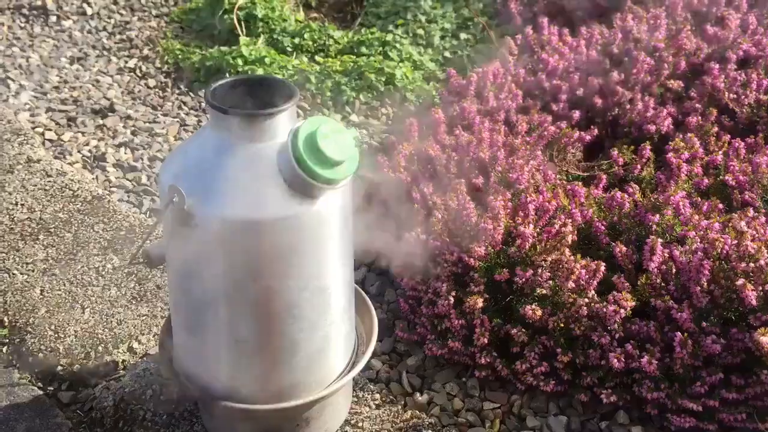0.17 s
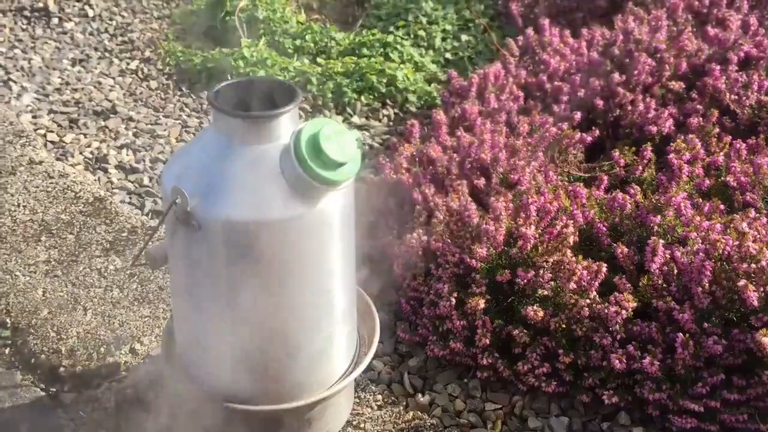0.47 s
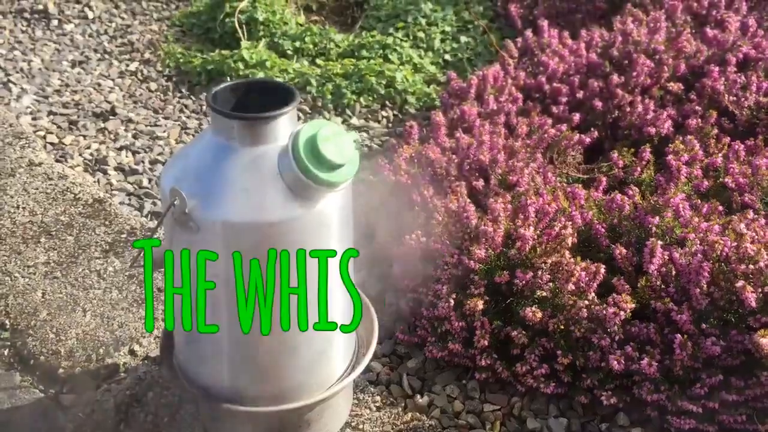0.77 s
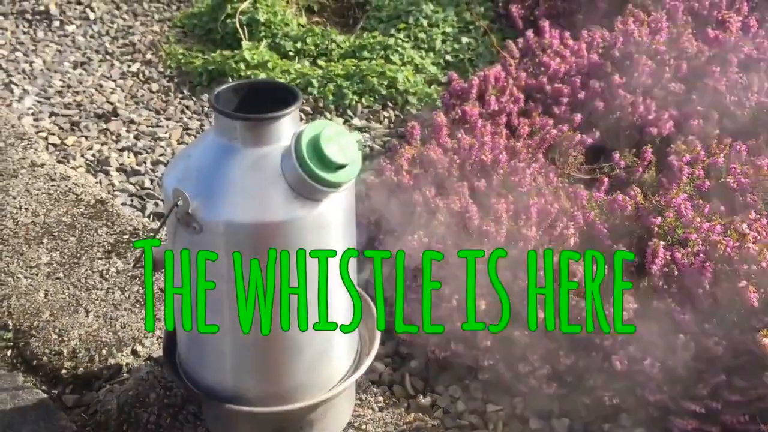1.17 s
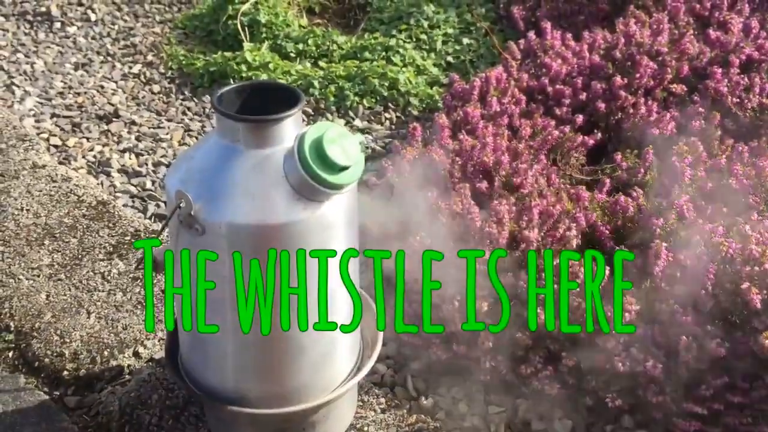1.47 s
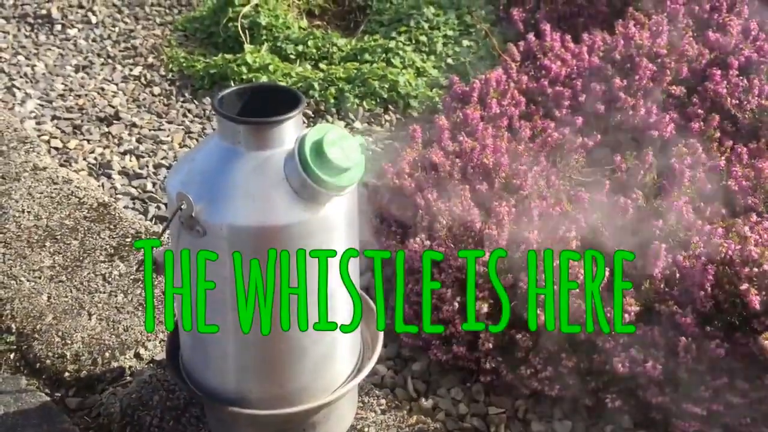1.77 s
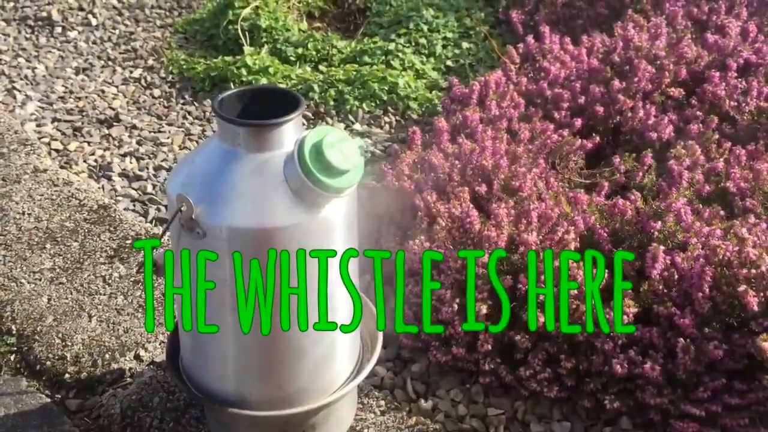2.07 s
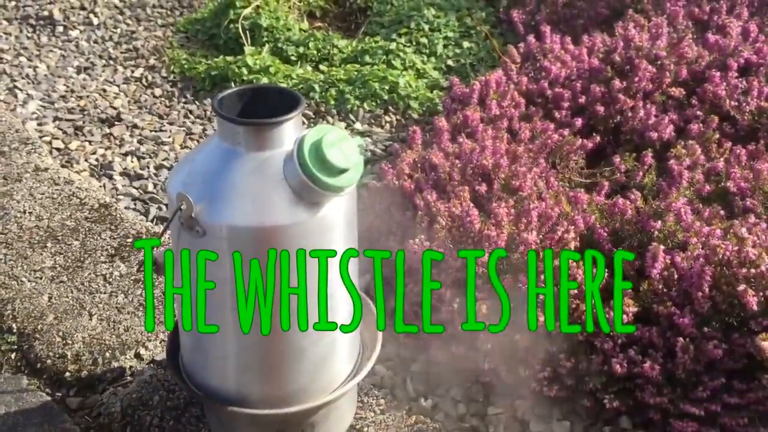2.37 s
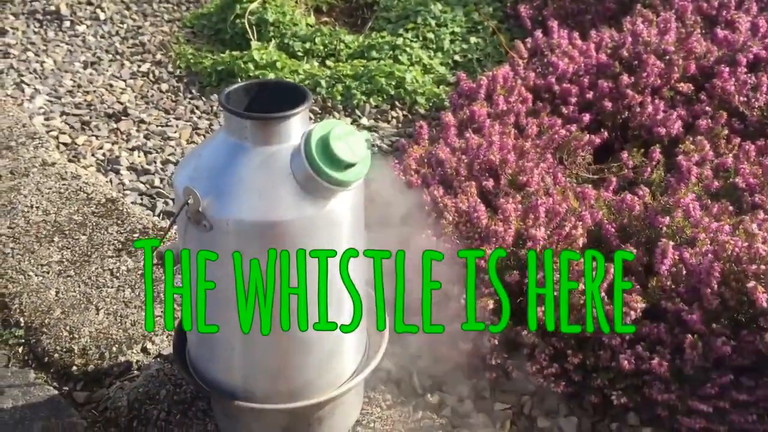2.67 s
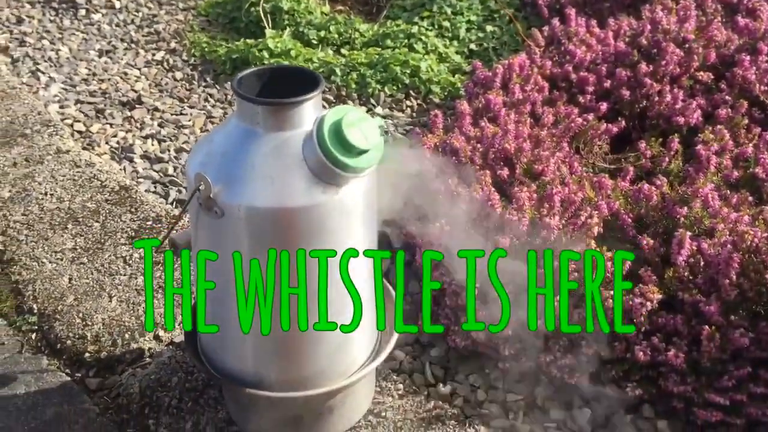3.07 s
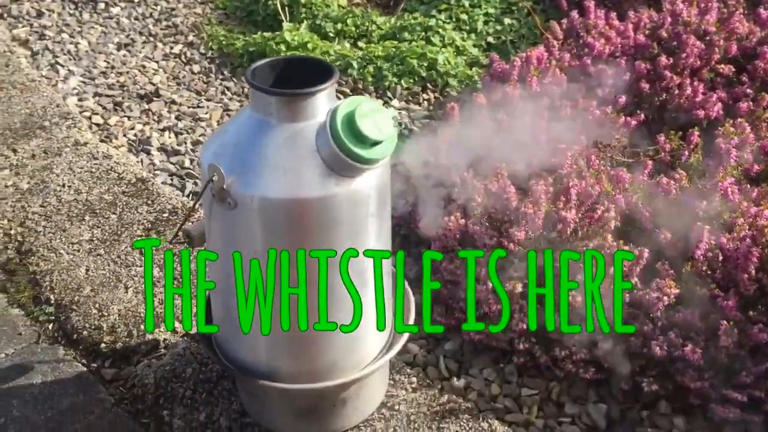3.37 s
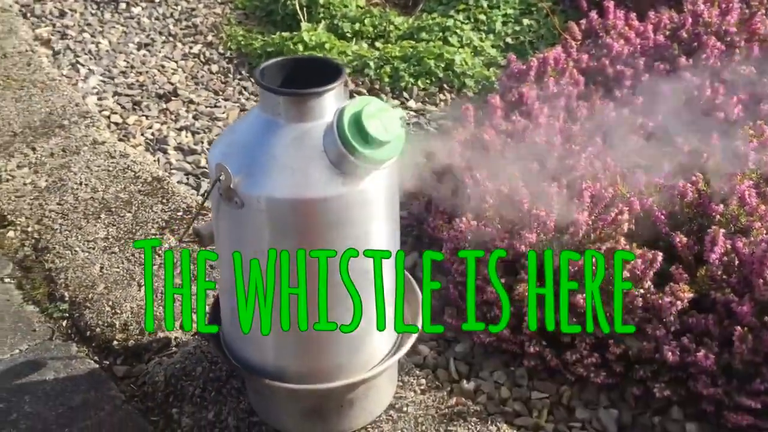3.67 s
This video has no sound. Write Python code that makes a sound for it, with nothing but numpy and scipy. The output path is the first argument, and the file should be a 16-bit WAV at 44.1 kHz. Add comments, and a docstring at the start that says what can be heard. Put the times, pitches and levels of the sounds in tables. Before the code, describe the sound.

Close outdoor phone pickup of a kettle whistle: after a tiny silence, a fluttering, raspy high tone with steam hiss, spitting droplets and faint bubbling, two brief pitch breaks, soft wind rumble, no ending.

```python
"""Outdoors, a phone close to a camping kettle with a steam whistle on its spout: after a short silence
it opens abruptly, mid-whistle. The jet sings partials whose pitch follows steam pressure; filtered noise
makes its hiss, short noise bursts the spat droplets ringing the cap's cavity, gliding tones the bubbles
inside, low noise the light wind on the microphone. Near 1.4 s and again near 2.6 s the tone flips into
a lower regime and back; whistle, hiss, boiling and wind last to the end."""
import sys
import numpy as np
from scipy import signal
from scipy.io import wavfile
from scipy.ndimage import uniform_filter1d

SR = 44100
rng = np.random.default_rng(int(sys.argv[2]) if len(sys.argv) > 2 else 0)


def unload_wav(signal):
    """Save mono or channel-first audio to the path in sys.argv[1] as 16-bit WAV at rate SR, clipped to [-1, 1]."""
    wavfile.write(
        sys.argv[1],
        SR,
        np.round(np.clip(np.atleast_2d(signal).T, -1, 1) * 32767).astype(np.int16),
    )


def volts_from_decibels(level):
    """Turn decibel levels (scalar or array-like) into linear amplitude factors."""
    exponent = np.asarray(level, float) / 20
    return 10 ** exponent


N = 168903

# Whistle in its normal regime, three stretches: t/s, f/Hz, level/dB (partials 1-4 together, before flutter)
TONE = [
    [(0.152, 1870, -35.5), (0.262, 1846, -32), (0.37, 1702, -35), (0.408, 1862, -37), (0.452, 1806, -39.5),
     (0.53, 1607, -24.5), (0.536, 1756, -31), (0.642, 1718, -42.5), (0.736, 1914, -30.5),
     (0.844, 1851, -34), (0.888, 1703, -32.5), (0.986, 1777, -41), (1.06, 1841, -34.5), (1.156, 1722, -38),
     (1.244, 1781, -37), (1.264, 1852, -27.5), (1.366, 1911, -31)],
    [(1.42, 1778, -28), (1.432, 1780, -40.5), (1.502, 1653, -32), (1.532, 1753, -43), (1.546, 1763, -36),
     (1.72, 1910, -30.5), (1.776, 1848, -35.5), (1.798, 1728, -30.5), (1.84, 1819, -36.5),
     (1.896, 1687, -38), (1.924, 1824, -34.5), (1.964, 1775, -40), (2.01, 1838, -33), (2.114, 1722, -33.5),
     (2.166, 1882, -37.5), (2.274, 1668, -32.5), (2.29, 1681, -40), (2.524, 1902, -29.5)],
    [(2.63, 1679, -39), (2.67, 1675, -27), (2.687, 1620, -24), (2.708, 1683, -38.5), (2.717, 1592, -23.5),
     (2.73, 1684, -35), (2.752, 1735, -43.5), (2.84, 1734, -44), (2.884, 1770, -40), (3.168, 1898, -31),
     (3.228, 1895, -35), (3.248, 1717, -35), (3.378, 1779, -34), (3.424, 1851, -32), (3.444, 1716, -33.5),
     (3.478, 1833, -30), (3.574, 1898, -32.5), (3.592, 1692, -33.5), (3.772, 1711, -36.5),
     (3.786, 1810, -35), (3.83, 1858, -30.5)],
]
# Resonances of the cap's cavity: f/Hz, width/Hz (of one filter pass), relative level/dB
CAVITY = [(1807, 190, 2), (2326, 128, -6), (3321, 335, -0.5), (3260, 400, -7), (5226, 330, -0.5),
          (5750, 390, -9.5), (6160, 230, -13.5), (6820, 1300, -12), (9360, 1170, -17.5), (10870, 940, -25),
          (13000, 1200, -25.5), (15300, 700, -29.5)]
REFERENCE_HZ = 1800  # pitch at which the pressure-dependent settings hold
JET_FLUTTER_DB = 1


def unit(x):
    """Scales a signal to an rms of 1."""
    return x / np.sqrt(np.mean(x ** 2))


def band(x, hz, width, order=1):
    """Resonance; higher order = steeper skirts."""
    b, a = signal.iirpeak(min(hz, SR * .45), hz / width, SR)
    for _ in range(order):
        x = signal.lfilter(b, a, x)
    return x


def noise_band(hz, width):
    """White noise through a resonance with steep skirts, at an rms of 1."""
    return unit(band(rng.standard_normal(N), hz, width, order=2))


def walk(rate):
    """Random levels held 1 / rate s and slewed twice, extremes rounded off; spread 1."""
    hold = max(int(SR / rate), 1)
    held = np.repeat(rng.standard_normal(N // hold + 4), hold)
    slewed = uniform_filter1d(uniform_filter1d(held, hold), hold)
    return unit(np.tanh(slewed[hold:N + hold] / 2))


def gate(t, start, end):
    """Smooth on and off, each ramp centred on its moment."""
    ramp_s = .009
    return np.clip(np.minimum(t - start, end - t) / ramp_s + .5, 0, 1)


def partial(k, phase, gain, rasp, flutter_db):
    """Partial k of the jet tone: turbulence flutters its level and adds rasp, noise around its line."""
    flutter = volts_from_decibels(flutter_db * walk(109.23))
    rasp_rate = 500  # new random values per second
    around = walk(rasp_rate) * np.cos(k * phase) + walk(rasp_rate) * np.sin(k * phase)
    return np.sqrt(2) * gain * flutter * (np.sin(k * phase) + rasp * min(k, 3) * around)


def whistle(t, hz):
    """Partials share one unsteady phase; pitch sets their balance, and weak partials flutter most."""
    # Flips to the low regime: start t/s, end t/s, f/Hz at start, f/Hz at end, level/dB of the strongest partial
    flips = [(1.367, 1.418, 1040, 1015, -30.5), (2.524, 2.622, 1032, 1008, -34)]
    # Partials 1-7 of the low regime: relative level/dB
    flip_partials_db = [-30, -14, -3.5, -25, 0, -32, -30]
    # Partials 5-8 of the normal regime: level/dB relative to the tone
    high_partials_db = [-48, -47, -55, -53]
    # The cavity favours whichever partial lies near a resonance; pitches of the balance below: f/Hz
    balance_hz = [1630, 1700, 1755, 1800, 1855, 1915]
    # One row per pitch: relative level/dB of partials 1, 2, 3, 4
    balance_db = [(-5.5, 13.5, -28, -15), (-17.5, 2.5, -24, -16.5), (-1.5, -2, -12, -20.5),
                  (0, -15.5, -4.5, -21.5), (2, -5.5, -4.5, -24), (6, -0.5, -0.5, -17)]
    jitter, jitter_rate = .0125, 200  # spread as a fraction of the pitch, new values per second
    base_rasp, rasp_db_per_100hz = .065, 4
    weak_flutter_db = 2.5  # extra flutter of the weakest partials

    def balance(pitch):
        return volts_from_decibels([np.interp(pitch, balance_hz, column) for column in np.array(balance_db).T])

    rows = np.vstack(TONE)
    flipped = sum(gate(t, start, end) for start, end, *_ in flips)
    wobble = 1 + jitter * walk(jitter_rate)
    phase = np.cumsum(hz * wobble) * 2 * np.pi / SR
    share = balance(hz * wobble)
    total = np.sqrt((balance(hz) ** 2).sum(axis=0))  # steady pitch, so the wobble also stirs the level
    level = volts_from_decibels(np.interp(t, rows[:, 0], rows[:, 2]))
    gains = [*(level * share / total), *(level * g for g in volts_from_decibels(high_partials_db))]
    rasp = base_rasp * volts_from_decibels(rasp_db_per_100hz * (hz - REFERENCE_HZ) / 100)
    normal = 0
    for k, gain in enumerate(gains, 1):
        weakness = np.clip(1.5 - 2 * gain / level, 0, 1)
        normal = normal + partial(k, phase, gain, rasp, JET_FLUTTER_DB + weak_flutter_db * weakness)
    out = (1 - flipped) * normal
    for start, end, start_hz, end_hz, db in flips:
        low_hz = np.interp(t, [start, end], [start_hz, end_hz]) * (.5 + .5 * wobble)  # half the jitter
        low_phase = np.cumsum(low_hz) * 2 * np.pi / SR
        low = sum(partial(k, low_phase, volts_from_decibels(db + relative_db), base_rasp, JET_FLUTTER_DB)
                  for k, relative_db in enumerate(flip_partials_db, 1))
        out += gate(t, start, end) * low
    return out


def steam(t, hz):
    """Jet hiss, louder with pressure: flickering broad bands, and the part that rings the cavity."""
    # Spectrum of the open hiss: f/Hz, relative level/dB (per Hz)
    spectrum = np.array([(200, -4.5), (1500, -1), (2800, -1), (4500, -0.5), (8000, -25), (11500, -37),
                         (15700, -62)])
    # Slow reference level under hiss and ring: t/s, level/dB
    drift = np.array([(.3, -62), (.9, -62), (1.7, -60), (2.501, -60.5), (2.75, -65), (3.2, -62.5),
                      (3.6, -58)])
    hiss_db, ring_db = 10.5, 11  # above the slow level
    hiss_db_per_100hz = 3.5  # pitch stands for pressure
    pressure_db = hiss_db_per_100hz * (hz - REFERENCE_HZ) / 100 + walk(20) + np.interp(t, *drift.T)
    hiss = 0
    for f in 200 * 2 ** np.arange(0, 6.4, 1 / 3):  # third-octave spacing
        density_db = np.interp(np.log(f), np.log(spectrum[:, 0]), spectrum[:, 1])
        band_db = density_db + 10 * np.log10(f) + 4.6 * walk(30.1)
        hiss = hiss + volts_from_decibels(band_db) * noise_band(f, f / 2.4)
    ring = sum(volts_from_decibels(db + 2.0 * walk(40)) * noise_band(f, width) for f, width, db in CAVITY)
    return volts_from_decibels(pressure_db) * (volts_from_decibels(hiss_db) * unit(hiss) + volts_from_decibels(ring_db) * ring)


def wind(t):
    """Light wind buffeting the microphone: a gusty low rumble with a puffing band above it."""
    # Gusts at the microphone: t/s, level/dB (of the rumble, before its flicker)
    gusts = np.array([(0.15, -56.5), (1.02, -61), (1.08, -44.5), (1.52, -63), (1.919, -50.5), (1.95, -34),
                      (2.03, -67), (2.08, -48.5), (2.431, -63.5), (2.508, -33), (2.572, -63), (2.99, -56),
                      (3.12, -67.5), (3.522, -46.5), (3.71, -59), (3.761, -47.5), (3.83, -73)])
    rumble = volts_from_decibels(2 * walk(36)) * noise_band(52, 75)
    puff = volts_from_decibels(-8.0 + 2 * walk(27.6)) * noise_band(114, 130)
    return volts_from_decibels(np.interp(t, gusts[:, 0], gusts[:, 1])) * (rumble + puff)


def droplets():
    """Spat water: a fine random spray and a few loud drops, short noise bursts that ring the cavity."""
    # Loud droplets: t/s, level/dB (before burst shape and cavity gain)
    loud_drops = [(0.2726, -46.5), (0.8456, -50), (0.9477, -45), (1.1302, -47.5), (1.2687, -44.5),
                  (1.6898, -43.5), (1.7606, -47), (1.8549, -47), (2.6176, -53), (3.4289, -44.5),
                  (3.5812, -41.5)]
    spray_per_s, spray_db, spray_spread_db = 130, -66, 1.5  # levels before burst shape and cavity gain
    rise_s, decay_s = .004, 0.0085
    cavity_gain_db = 28
    age = np.arange(int(SR * .06)) / SR
    burst = np.exp(-age / decay_s) * (1 - np.exp(-age / rise_s))
    spit = np.zeros(N)
    chance = rng.random((int(spray_per_s * N / SR), 2))
    spit[(chance[:, 0] * N).astype(int)] = volts_from_decibels(spray_db - spray_spread_db * np.log(chance[:, 1]))
    for s, db in loud_drops:
        spit[int(s * SR)] = volts_from_decibels(db)
    blow = np.convolve(spit, burst)[:N] * rng.standard_normal(N)
    return volts_from_decibels(cavity_gain_db) * sum(volts_from_decibels(db) * band(blow, f, width, order=2) for f, width, db in CAVITY)


def boil(t):
    """Bubbles: decaying tones that glide up a little, many faint, a few loud; the hollow murmurs along."""
    # Loud bubbles: t/s, level/dB (before onset and decay), f/Hz (at the start)
    loud_bubbles = [(0.466, -40.5, 533), (0.825, -36.5, 398), (1.279, -37.5, 1036), (2.044, -36, 1118),
                    (2.502, -39, 1157), (2.617, -21, 1930), (2.884, -38.5, 1105), (2.99, -41, 657),
                    (3.119, -37.5, 372.2), (3.585, -38, 1136)]
    # Hollow of the kettle, rung by the boiling: t/s, level/dB (before its flicker)
    murmur = np.array([(.25, -60), (1.45, -71), (1.9, -63), (2.7, -71), (3.5, -62)])
    faint_per_s, faint_db, faint_spread_db = 260, -63.5, 2.2
    faint_hz, faint_octaves = 537.3, 0.71  # middle pitch, reach to either side
    decay_cycles = 19.9  # cycles until a bubble has faded by a factor of exp(3.5)
    chance = rng.random((int(faint_per_s * N / SR), 3))
    times = chance[:, 0] * N / SR
    levels_db = faint_db - faint_spread_db * np.log(chance[:, 1])
    pitches = faint_hz * 2 ** (faint_octaves * (2 * chance[:, 2] - 1))
    bubbles = np.zeros(N + SR)
    for s, db, hz in np.vstack([np.c_[times, levels_db, pitches], loud_bubbles]):
        cycles = np.arange(int(decay_cycles * 1.7 * SR / hz)) * hz / SR
        glide = np.sin(2 * np.pi * cycles * (1 + 0.0023 * cycles))
        grain = glide * np.exp(-3.5 * cycles / decay_cycles) * np.minimum(cycles / 2, 1)
        first = int(s * SR)
        bubbles[first:first + len(cycles)] += volts_from_decibels(db) * grain
    hollow_db = np.interp(t, *murmur.T) + 4.6 * walk(14)
    return bubbles[:N] + volts_from_decibels(hollow_db) * noise_band(360, 230)


def scene():
    """Everything heard at one spot, in one channel."""
    t, rows = np.arange(N) / SR, np.vstack(TONE)
    hz = np.interp(t, rows[:, 0], rows[:, 1])
    return (whistle(t, hz) + steam(t, hz) + wind(t) + droplets() + boil(t))[None]


def top_cut(x):
    """Nothing passes above the cut-off."""
    return signal.sosfilt(signal.butter(12, 16220, fs=SR, output="sos"), x)


def record(dry):
    """The phone opens abruptly, and its sound lacks the deepest bass and the top of the treble."""
    start_s, bass_hz, top_hz = 0.1519, 35, 15740
    opened = dry * (np.arange(N) > start_s * SR)
    no_bass = signal.sosfilt(signal.butter(2, bass_hz, "high", fs=SR, output="sos"), opened)
    mix = signal.sosfilt(signal.ellip(14, .2, 60, top_hz, fs=SR, output="sos"), no_bass)
    return top_cut(mix)


dry = scene()
out = record(dry)
unload_wav(out)
```